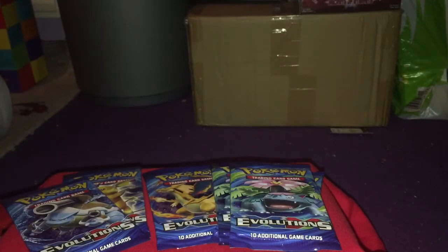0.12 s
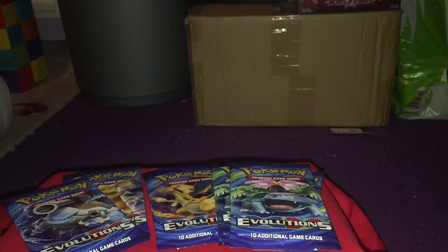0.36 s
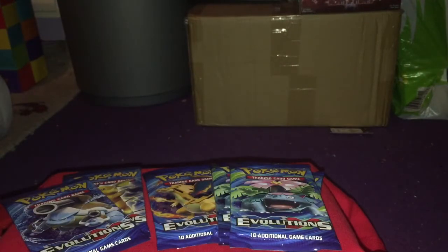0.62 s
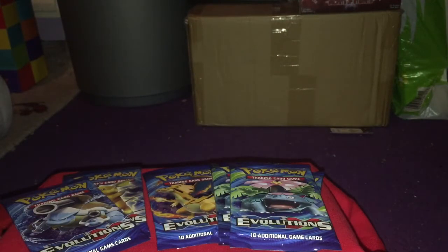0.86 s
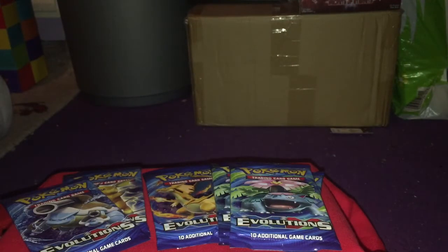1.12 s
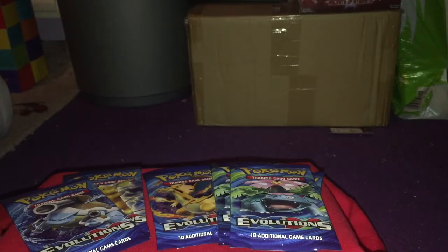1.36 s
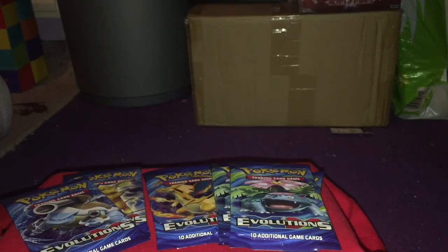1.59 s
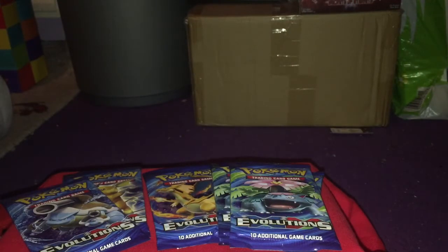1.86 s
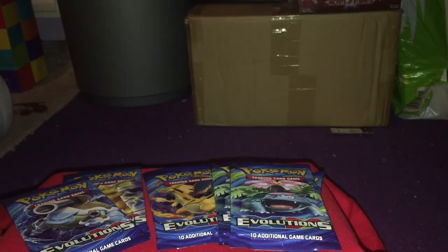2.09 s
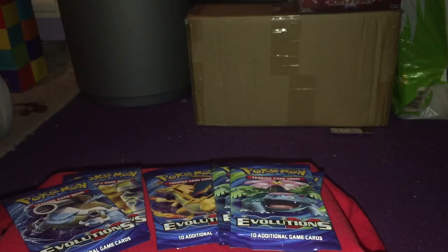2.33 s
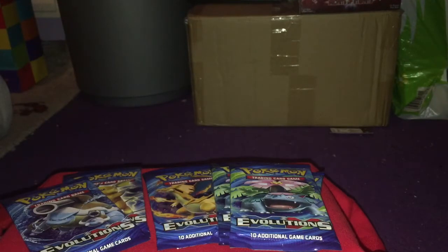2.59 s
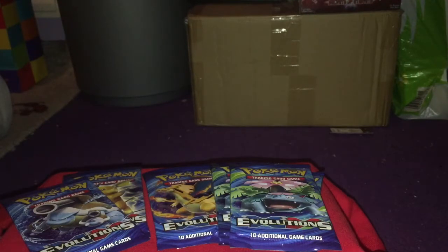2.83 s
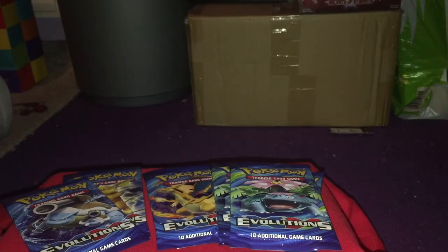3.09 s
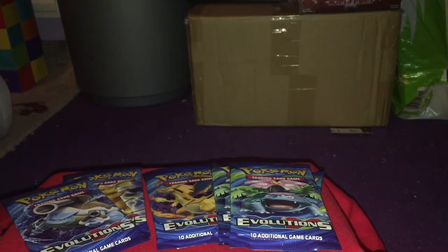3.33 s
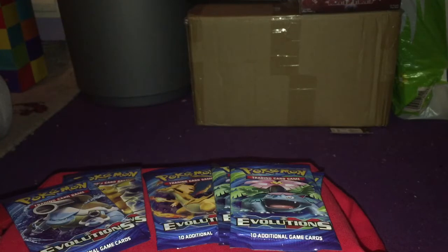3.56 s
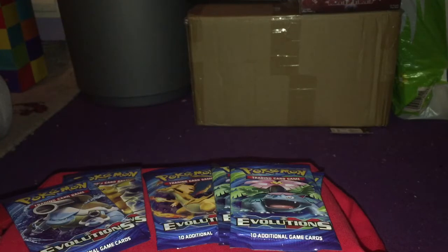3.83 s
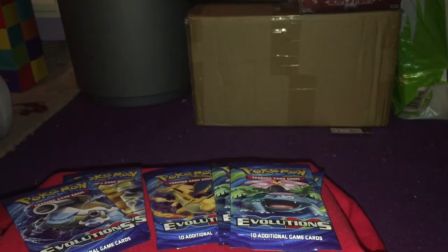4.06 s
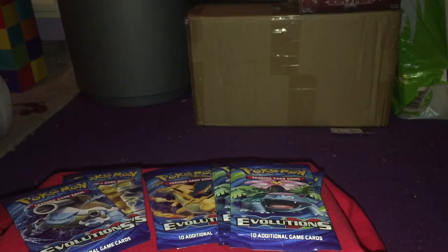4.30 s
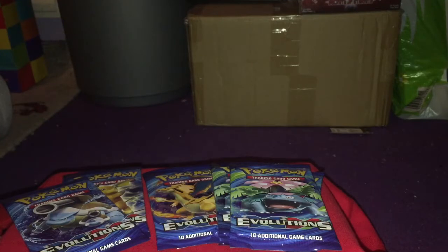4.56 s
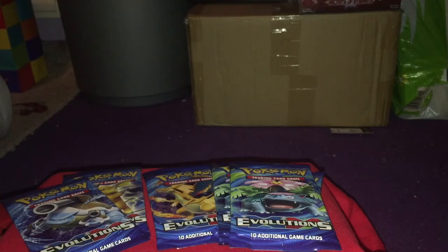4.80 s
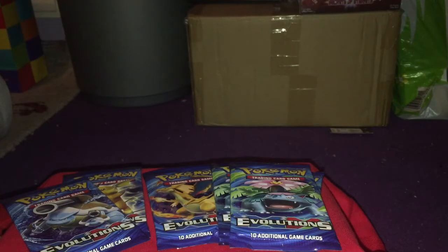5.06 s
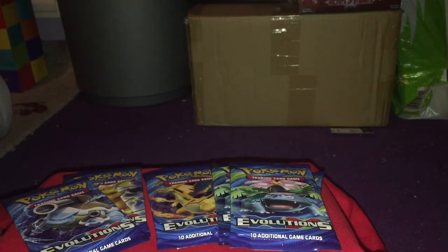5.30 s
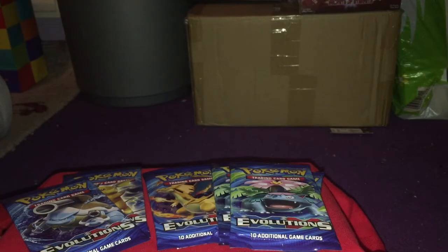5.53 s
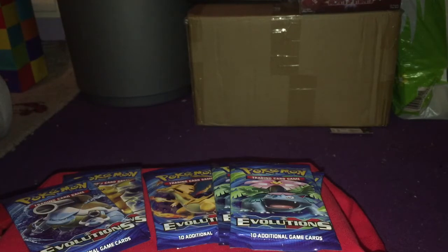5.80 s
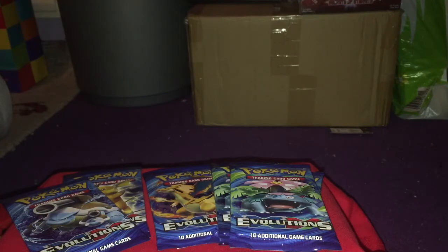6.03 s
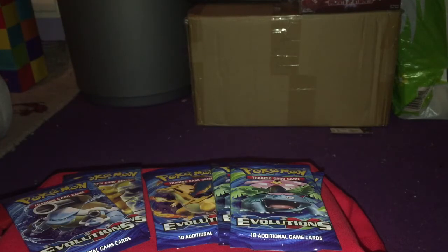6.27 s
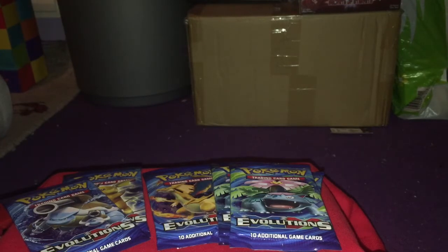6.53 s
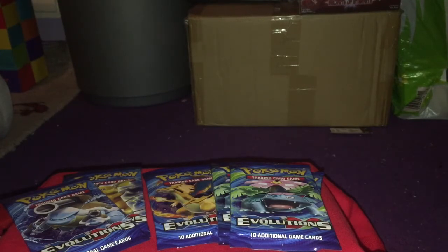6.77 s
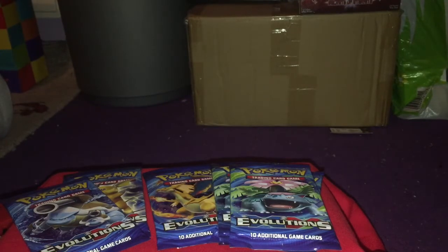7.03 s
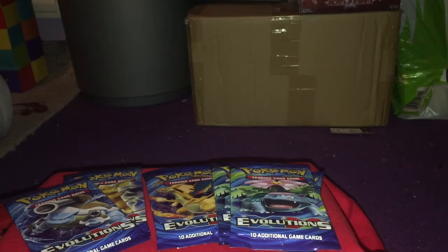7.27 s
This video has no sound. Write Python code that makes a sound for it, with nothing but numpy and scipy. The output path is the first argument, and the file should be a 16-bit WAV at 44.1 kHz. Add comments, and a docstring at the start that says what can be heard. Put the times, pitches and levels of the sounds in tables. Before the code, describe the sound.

Trading cards and crinkly foil wrappers handled close up in a small quiet room, with sharp snaps, hollow stack knocks and soft floor thumps.

```python
"""A faint hiss and an appliance's hum run throughout, under handling of cards and their plastic wrapping,
light to loud. Each stroke is a swarm of tiny creases over a sliding hiss, with card bends, a sleeve ring
and a low rumble. Stacks knock as short damped modes, stiffer folds snap as rings with noise, and the floor
thumps low. All is close to a microphone in a small quiet room; a near wall answers after milliseconds."""
import sys
import numpy as np
from scipy import signal
from scipy.fft import rfft, irfft, next_fast_len
from scipy.io import wavfile
from scipy.ndimage import uniform_filter1d, map_coordinates

SR = 44100
rng = np.random.default_rng(int(sys.argv[2]) if len(sys.argv) > 2 else 0)


def output_pcm(signal):
    """Save a mono or channel-first signal as 16-bit PCM at the path in sys.argv[1].

    Samples are clipped to [-1, 1] before scaling.
    """
    pcm = np.clip(np.atleast_2d(signal).T, -1, 1) * 32767
    wavfile.write(sys.argv[1], SR, np.round(pcm).astype(np.int16))


def linear_from_db(decibels):
    """Turn decibels (scalar or array-like) into linear amplitude factors; 0 gives 1."""
    return 10 ** (np.asarray(decibels, float) / 20)


N = 325899  # length in samples


def unit(x):
    """Scaled to rms 1."""
    return x / np.sqrt(np.mean(x ** 2) + 1e-20)


def along(points, hz):
    """Curve of (hz, value) points, read on a log frequency axis."""
    point_hz, value = np.transpose(points)
    return np.interp(np.log(hz + 1), np.log(point_hz + 1), value)


def wobble(rate_hz):
    """A smooth random curve with rate_hz knots a second."""
    knots = rng.standard_normal(int(N * rate_hz / SR) + 4)
    return map_coordinates(knots, [np.arange(N) * rate_hz / SR])


def shaped(x, response):
    """x filtered by a response given as a function of frequency."""
    size = next_fast_len(N + 8192)
    return irfft(rfft(x, size) * response(np.fft.rfftfreq(size, 1 / SR)), size)[..., :N]


def coloured(x, spectrum):
    """x filtered by a table of gains, at rms 1."""
    return unit(shaped(x, lambda hz: linear_from_db(along(spectrum, hz))))


def rings(start_s, size, hz, t60_s, count, attack_s):
    """Sum of damped sines, one for each start, each lasting count samples."""
    t = np.arange(count) / SR
    fade = linear_from_db(-60 * t / t60_s[:, None]) * (1 - np.exp(-t / attack_s))
    wave = size[:, None] * fade * np.sin(2 * np.pi * hz[:, None] * t)
    at = np.round(start_s * SR).astype(int)[:, None] + np.arange(count)
    return np.bincount(at.ravel(), wave.ravel(), N + count + SR)[:N]


def creases(count, hz, spread, cycles, spiky_db, size):
    """Tiny folds at random moments, each a brief ring at its own pitch; a few are much larger."""
    when, sign, rank = rng.random((3, count))
    pitch_hz = np.clip(hz * np.exp(spread * rng.standard_normal(count)), 100, SR / 2.5)
    swing = np.sign(sign - 0.5) * linear_from_db(-spiky_db * np.log(rank + 0.008))  # low ranks swing widest
    return unit(rings(when * N / SR, swing, pitch_hz, cycles / pitch_hz, size, attack_s=6e-5))


def flexing(x, depth_db, size, count):
    """A bending sheet keeps changing its modes: random peaks smoothed over size bins and count frames."""
    z = signal.stft(x, nperseg=512)[2]
    field = uniform_filter1d(rng.standard_normal(z.shape), size, 0)
    field = uniform_filter1d(field, count, 1)
    return unit(signal.istft(z * linear_from_db(depth_db * unit(field)), nperseg=512)[1][:N])


def swells(rows, peak_db):
    """Level over time of a layer: every stroke swells to its own peak and fades; their powers add."""
    swell_db = 20  # gained over the rise, lost over the fall
    roundness = 1.29  # 1 = pointed stroke, 2 = rounded top and steep ends
    peak_s, _, rise_s, fall_s = np.transpose(rows)[:4, :, None]
    t = np.arange(0, N + 64, 64) / SR
    away = np.where(t < peak_s, (peak_s - t) / rise_s, (t - peak_s) / fall_s)
    power = np.sum(linear_from_db(peak_db[:, None] - swell_db * away ** roundness) ** 2, axis=0)
    return np.interp(np.arange(N) / SR, t, np.sqrt(power))


# colour of the steady hiss: hz, gain_db
HISS_COLOUR = [(24, -35), (40, 7.5), (106, -6), (170, -5), (334, -11.5), (639, -16), (1080, -18.5),
               (1290, -18.5), (1690, -14.5), (2170, -20), (2650, -20.5), (5750, -24), (10500, -29),
               (11900, -27.5), (15600, -27)]
# partials of the appliance hum: pitch_hz, level_db (rms, about which the level wavers)
HUM_PARTIALS = [(96.9, -70.5), (145.3, -90)]


def background():
    """Microphone hiss is coloured noise that flutters; the hum is sines wavering in level and phase."""
    t = np.arange(N) / SR
    waver_db = 3 * wobble(3.5)
    hum = 0
    for pitch_hz, level_db in HUM_PARTIALS:
        phase = 2 * np.pi * pitch_hz * t + 1.24 * wobble(2.6)
        hum = hum + np.sqrt(2) * linear_from_db(level_db + waver_db) * np.sin(phase)
    flutter_db = 2.4 * wobble(15)
    hiss = coloured(rng.standard_normal(N), HISS_COLOUR)
    return linear_from_db(-68.5 + flutter_db) * hiss + hum


# colour of the crinkling wrapping: hz, gain_db
CRINKLE_COLOUR = [(590, -7), (1000, -42), (1240, -16), (1440, 2.5), (1740, 0.5), (2040, -1.5), (4000, 6),
                  (4830, 1.5), (6500, 1), (8450, -34), (14300, -120)]


def crinkle_texture(folds):
    """Mid-pitched folds over sliding noise, with the shifting modes of a bent sheet."""
    sliding = rng.standard_normal(N)
    return flexing(coloured(folds + 0.85 * sliding, CRINKLE_COLOUR), depth_db=4.6, size=2, count=12)


# colour of the bright top of the wrapping: hz, gain_db
SHEEN_COLOUR = [(3240, -12), (5500, -5.5), (6320, -6.5), (7830, -9), (8890, -6.5), (10400, -9), (12300, -8),
                (15600, -6)]


def sheen_texture():
    """Very short high ticks over sliding noise make the bright edge of the handling."""
    ticks = creases(count=16000, hz=9000, spread=0.5, cycles=5, spiky_db=3, size=48)
    sliding = rng.standard_normal(N)
    return flexing(coloured(ticks + 1.7 * sliding, SHEEN_COLOUR), depth_db=3.5, size=4, count=12)


# colour of the bending cards: hz, gain_db
BODY_COLOUR = [(160, -65), (280, -5.5), (571, -5), (629, -2), (873, -5), (1300, 2), (1690, -32),
               (2860, -120)]


def body_texture():
    """Bending cards give longer, lower-pitched creases under stronger sliding noise."""
    bends = creases(count=4000, hz=611.5, spread=0.36, cycles=15.5, spiky_db=2, size=512)
    sliding = rng.standard_normal(N)
    return flexing(coloured(bends + 3.86 * sliding, BODY_COLOUR), depth_db=4.3, size=1, count=8)


# modes rung by light rubbing: pitch_hz, width_hz, gain_db
RUB_MODES = [(2213, 380, 25), (3720, 20, -14)]


def rub_texture(folds):
    """Rubbing noise and a trace of the folds drive resonances of the sleeve."""
    def modes(hz):
        total = 0
        for pitch_hz, width_hz, gain_db in RUB_MODES:
            damping = 1j * hz * width_hz
            total = total + linear_from_db(gain_db) * damping / (pitch_hz ** 2 - hz ** 2 + damping)
        return total
    return unit(shaped(rng.standard_normal(N) + 0.071 * folds, modes))


# colour of the low handling rumble: hz, gain_db
RUMBLE_COLOUR = [(24, -41), (40, -22), (70, -5.5), (124, -3), (152, -0.5), (226, -10), (265, -8.5),
                 (330, -38), (430, -65), (730, -120)]


def rumble_texture():
    """Low noise whose level wavers at random."""
    return coloured(rng.standard_normal(N), RUMBLE_COLOUR) * linear_from_db(-6.0 + 2.75 * wobble(25))


# handling strokes, levels before each layer's trim:
# peak_s, crinkle_db, rise_s, fall_s, sheen_over_crinkle_db, rumble_over_crinkle_db
HANDLING = [ (0.03, -59.5, 0.2, 0.18, 1, -2), (0.312, -59.5, 0.12, 0.067, -8, 2.5),
            (0.351, -43, 0.015, 0.039, -11, -20), (0.434, -43.5, 0.041, 0.077, -8.5, -2),
            (0.535, -38, 0.036, 0.1, -10, -6), (0.575, -45.5, 0.069, 0.12, -13.5, 2),
            (0.752, -48.5, 0.029, 0.05, -18, -4), (0.85, -55.5, 0.31, 0.11, -8.5, -6),
            (0.955, -51.5, 0.18, .065, -12, -4), (1.075, -65.5, 0.15, 0.12, -8, 13),
            (1.236, -64.5, 0.21, .06, -5, 4), (1.368, -73.5, 0.085, 0.1, -8, 10),
            (1.51, -54.5, 0.041, 0.23, -20, -2), (1.592, -53, 0.056, 0.21, -4.5, -16),
            (1.669, -60.5, 0.17, 0.05, 2, 14), (1.85, -59, 0.15, 0.039, -8, -8),
            (1.888, -44.5, 0.027, 0.033, -17, 5), (2.023, -61, 0.099, 0.19, -7, 3.5),
            (2.215, -51, 0.063, 0.11, -13, 0), (2.295, -57.5, 0.13, 0.037, -7, 9.5),
            (2.54, -73.5, 0.22, 0.091, -15, 11), (2.587, -46.5, 0.042, 0.13, -11, 1.5),
            (2.875, -53.5, 0.037, 0.33, -10, 1), (2.963, -54, 0.21, 0.1, -0.5, 5),
            (3.055, -47.5, 0.042, 0.055, -8, -11), (3.15, -68, 0.057, 0.048, -8, 17),
            (3.239, -52.5, 0.1, 0.19, -4, -4), (3.475, -64.5, 0.06, 0.11, -12, 7),
            (3.518, -46, 0.023, 0.077, -10.5, -0.5), (3.6, -45.5, 0.019, 0.031, -8, 5.5),
            (3.663, -48.5, 0.038, 0.028, 0, -10), (3.766, -37.5, 0.04, 0.27, -3.5, -19),
            (3.838, -35.5, 0.1, 0.087, 0, -5.5), (3.928, -46, 0.24, 0.018, -3, 3),
            (4.088, -44.5, 0.072, 0.059, -0.5, -1.5), (4.244, -35.5, 0.035, 0.13, -4, -4.5),
            (4.295, -38, 0.081, 0.094, 1, -0.5), (4.342, -38, 0.09, .045, -1.5, 6.5),
            (4.45, -55.5, 0.036, 0.08, -2, -11), (4.5, -36.5, 0.032, 0.058, -7.5, -14),
            (4.541, -36.5, .06, 0.035, -7, -13), (4.6, -57, .06, 0.13, -4, 0),
            (4.708, -41.5, 0.024, 0.033, -9.5, -8.5), (4.8, -64, 0.06, 0.047, -6, -20),
            (4.874, -48, 0.04, 0.023, -5, -21), (4.964, -62, 0.077, 0.15, -2, -21),
            (5.044, -64, 0.15, 0.049, -5, 4), (5.165, -61.5, .075, 0.06, -1, -19),
            (5.217, -52.5, 0.057, 0.018, -1.5, -12), (5.31, -58, 0.043, 0.23, 3.5, -41),
            (5.425, -52, .12, 0.11, -1, 0), (5.5, -45.5, 0.16, 0.1, -1.5, -26),
            (5.558, -35, 0.044, .06, -1.5, -2), (5.604, -47, 0.15, 0.028, 7, 2),
            (5.715, -54, 0.02, 0.056, 8, -27), (5.783, -35, 0.052, 0.053, 0, -6),
            (5.85, -39.5, 0.072, 0.053, -1, 0), (5.948, -63, 0.032, 0.033, -7, 19),
            (6.015, -66, 0.11, .1, -3, -15), (6.068, -53.5, 0.043, .035, -3, -6),
            (6.299, -67.5, .105, 0.063, 2, 13.5), (6.421, -71.5, 0.065, 0.034, -17, -3),
            (6.495, -63, 0.037, 0.054, -5, 7), (6.57, -69.5, 0.13, 0.11, 2, 3),
            (6.651, -49, .05, 0.23, -0.5, -29), (6.72, -52, 0.096, 0.053, 7.5, 7.5),
            (6.801, -33, 0.1, 0.078, -1.5, -1.5), (6.895, -51.5, 0.11, .12, -6, 3),
            (7.0, -56, 0.041, 0.04, -4, 4.5), (7.06, -66.5, .1, .1, -0.5, 10),
            (7.116, -52, 0.041, 0.055, -10, 3), (7.247, -48.5, 0.077, 0.19, -9, -11.5),
            (7.351, -56.5, 0.23, 0.026, -7.5, -8)]
# light slides of a finger that ring the sleeve, levels before stick and slip:
# peak_s, level_db, rise_s, fall_s
FINGER_SLIDES = [(0.05, -58, 0.28, 0.085), (0.66, -55.5, 0.056, 0.031), (0.87, -59.5, 0.13, 0.19),
                 (1.65, -55, 0.098, 0.037), (2.6, -57, 0.069, 0.088), (4.43, -64, .06, .06),
                 (5.02, -66, 0.065, .05), (5.205, -56, 0.04, 0.031), (5.36, -56, .12, 0.1),
                 (6.02, -66.5, 0.042, .06), (7.3, -74, 0.079, 0.1)]
# slow trim of the card body, lowest around 4.1 to 4.3 s: time_s, gain_db
CARD_LEVEL = [(0, -7.5), (.6, -10), (1.1, -5), (2.2, -5), (3.3, -5.5), (3.65, -11), (3.85, -5),
              (4.1, -15.5), (4.3, -14.5), (4.4, -10), (4.9, -8), (5.4, -11.5), (6.0, -10.5), (6.8, -7),
              (7.39, -7.5)]


def strokes():
    """Creases and sliding hiss rise and fall together; fingers stick and slip many times a second."""
    db, sheen_db, rumble_db = np.transpose(HANDLING)[[1, 4, 5]]
    folds = creases(count=9000, hz=2800, spread=0.45, cycles=12, spiky_db=1.8, size=240)
    crinkle = swells(HANDLING, db) * crinkle_texture(folds) * linear_from_db(-5.0)
    sheen = swells(HANDLING, db + sheen_db) * sheen_texture() * linear_from_db(-3.0)
    # strokes with more rumble bend the cards more: 0.35 dB per dB
    card_db = np.interp(np.arange(N) / SR, *np.transpose(CARD_LEVEL))
    body = swells(HANDLING, db + 0.35 * rumble_db) * body_texture() * linear_from_db(card_db)
    # the ring is -67 dB under a -60 dB stroke and grows 0.73 dB per dB of crinkle
    stroke_ring = swells(HANDLING, -67 + 0.73 * (db + 60))
    slide_ring = swells(FINGER_SLIDES, np.transpose(FINGER_SLIDES)[1])
    ring = np.hypot(stroke_ring, slide_ring) * rub_texture(folds)
    rumble = swells(HANDLING, db + rumble_db) * rumble_texture()
    slip = linear_from_db(1.66 * wobble(35) + 1.49 * wobble(120))
    return slip * (crinkle + sheen + body + ring) + rumble


# hollow knocks of a stack, before mode ratios and trims: start_s, level_db, pitch_hz
STACK_KNOCKS = [(0.051, -49.5, 440), (0.182, -52, 625), (0.515, -28.5, 1010), (0.693, -44, 1150),
                (0.838, -46, 1020), (0.932, -39, 1190), (0.951, -37, 1130), (1.005, -38, 680),
                (1.0658, -26.5, 652), (1.539, -28, 870), (1.611, -39.5, 626), (1.649, -45, 500),
                (1.877, -38, 402), (2.013, -45.5, 620), (2.184, -17, 560), (2.196, -25.5, 770),
                (2.211, -33, 920), (2.943, -46, 535), (3.526, -37.5, 1130), (3.631, -35.5, 460),
                (4.322, -50, 624), (4.499, -35, 766), (4.547, -37.5, 398), (5.54, -32, 1140),
                (5.771, -32.5, 684), (6.787, -23.5, 1180), (7.19, -43, 855)]


def knocks():
    """The stack rings briefly near its pitch and, weaker, at two higher modes."""
    s, db, hz = np.transpose(STACK_KNOCKS)
    start_s = s + 0.0011
    t60_s = np.full_like(s, 0.013)
    out = np.zeros(N)
    for ratio, level_db in [(1.018, 4.5), (1.4, -0.5), (1.9, -6)]:
        out -= rings(start_s, linear_from_db(db + level_db), hz * ratio, t60_s, count=3000, attack_s=0.0008)
    return out


# early wall echoes, before softening: delay_s, gain_db
WALL_ECHOES = [(.004, -10), (.0085, -41), (0.0127, -13), (0.023, -45)]
# decay of the room tail: hz, t60_s
ROOM_DECAY = [(100, 0.031), (1000, 0.089), (4000, 0.097), (12000, 0.099)]


def room(x):
    """A few soft early walls, then a tail in which each frequency dies at its own speed."""
    early = 0
    for delay_s, gain_db in WALL_ECHOES:
        early = early + linear_from_db(gain_db) * np.pad(x, (round(delay_s * SR), 0))[:N]
    early = shaped(early, lambda hz: 1 / (1 + 1j * hz / 9000))
    hz, t, z = signal.stft(rng.standard_normal(SR // 2), SR, nperseg=256)
    fade = linear_from_db(-60 * t / along(ROOM_DECAY, hz)[:, None])
    tail = signal.istft(z * fade, SR, nperseg=256)[1]
    delayed = np.pad(x, (380, 0))  # samples
    late = signal.fftconvolve(delayed, tail / np.linalg.norm(tail))[:N]
    return early + linear_from_db(-6.5) * late


# folds that snap, levels before each part's trim: start_s, level_db, pitch_hz, sheen_over_level_db
FOLD_SNAPS = [(0.2907, -43, 2070, -23), (0.349, -39, 2760, -14), (0.416, -35, 1750, -8),
              (0.5152, -9.5, 2570, -16), (0.5284, -21, 2160, -7), (0.5531, -17, 1870, -8),
              (0.7425, -40.5, 2280, -22), (0.9315, -33, 4110, -12), (0.9512, -34.5, 1900, -23),
              (1.5412, -24.5, 2700, -42), (1.875, -29, 3460, -12), (1.8803, -29.5, 1660, -14),
              (2.0152, -39, 1690, -18), (2.1862, -23, 1800, -46), (2.574, -37, 2380, -27),
              (2.597, -40, 2270, -17), (2.8965, -38.5, 1330, -17), (2.9414, -34, 1750, -6),
              (3.0462, -33, 2200, -27), (3.512, -36, 2100, -21), (3.5269, -29.5, 1960, -20),
              (3.5987, -39.5, 2100, -1), (3.6481, -42, 2190, -25), (3.657, -37.5, 2500, -15),
              (3.7733, -27, 2750, -13), (4.2285, -23, 4500, -24), (4.4653, -29.5, 3470, -14),
              (4.4976, -12, 5120, -30), (4.5014, -10.5, 3750, -39), (4.5254, -45, 2340, -17),
              (4.5454, -25, 2650, -9), (4.576, -22, 3940, -21), (4.7006, -34, 3550, -26),
              (4.8754, -40, 2770, -10), (5.4304, -32.5, 2440, 1), (5.484, -37, 3230, -13),
              (5.5159, -23.5, 3600, -20), (5.5368, -29, 2200, 0.5), (5.5562, -23, 2760, -20),
              (5.6975, -46, 3860, 7.5), (5.743, -60, 3630, -17), (5.76, -32, 2620, -13),
              (5.7812, -27, 1810, -32), (5.8376, -31.5, 1810, -17), (6.0706, -37.5, 2020, 9.5),
              (6.4348, -38.5, 3060, -28), (6.483, -38, 2400, -31), (6.633, -40, 3160, -11),
              (6.6787, -26, 2130, -5), (6.733, -32, 2500, -14), (6.784, -25, 1800, -14),
              (6.898, -33.5, 2200, -15), (6.994, -56, 2220, -6), (7.1115, -37, 2680, -17)]


def snaps():
    """A fold lets go: a short ring at its pitch, a bright crack and a fading noise of smaller releases."""
    s, db, hz, sheen_db = np.transpose(FOLD_SNAPS)
    s = s + 0.00048
    out = rings(s, linear_from_db(db + 2.5), hz, 14 / hz, count=600, attack_s=0.00042)
    t = np.arange(3000) / SR
    onset = 1 - np.exp(-t / 9e-4)
    bright = signal.butter(2, 4500, "high", fs=SR)
    for at, level_db, pitch_hz, bright_db in zip(s, db, hz, sheen_db):
        noise = rng.standard_normal((2, len(t)))
        around = signal.butter(1, [pitch_hz / 1.5, min(pitch_hz * 1.6, 15000)], "band", fs=SR)
        scatter = unit(signal.lfilter(*around, noise[0])) * linear_from_db(level_db - 22.0 - 60 * t / 0.044)
        crack = unit(signal.lfilter(*bright, noise[1])) * onset
        crack *= linear_from_db(level_db + bright_db - 2 - 60 * t / 0.011)
        piece = out[round(at * SR):][:len(t)]  # a view: adding to it fills out
        piece += (scatter + crack)[:len(piece)]
    return out


# soft thumps through the floor, before delays and trims: start_s, level_db, pitch_hz, board_over_level_db
FLOOR_THUMPS = [(0.547, -30.5, 209, -3), (0.685, -46, 186, -7), (0.948, -42.5, 280, -25),
                (1.055, -44, 157, -24), (1.597, -41.5, 172, -1), (1.867, -33, 194, -31),
                (2.18, -23.5, 134, -21), (2.579, -45, 250, -24), (2.66, -41.5, 167, -3),
                (2.942, -37, 210, -9), (2.945, -36, 124, -22), (3.242, -47, 191, -5), (3.463, -36, 81, -17),
                (3.583, -37, 67.4, -3), (3.81, -40, 149, -20), (4.079, -35, 150, -12),
                (4.259, -52, 143, -10), (4.331, -32, 155, -7), (4.491, -41.5, 216, -25),
                (4.614, -48, 198, -9), (4.701, -45.5, 196, -2), (5.021, -38.5, 109, -10),
                (5.205, -43.5, 134, -2.5), (5.408, -34, 110, -11), (5.55, -31.5, 80, 0),
                (5.771, -35, 67, -10), (5.933, -42, 103, -5), (6.282, -38, 77, -21), (6.489, -51, 111, 2.5),
                (6.606, -37.5, 65.3, -8), (6.715, -37, 76, -8)]


def thumps():
    """Low blows come through the carpet with a soft start; a 66 Hz floorboard swings in later."""
    s, db, hz, board_db = np.transpose(FLOOR_THUMPS)
    start_s = s + 0.008
    blow = rings(start_s, linear_from_db(db + 2.0), hz, np.full_like(s, 0.067), count=8000, attack_s=0.0029)
    board = rings(start_s + 0.0087, linear_from_db(db + board_db + 5.5), np.full_like(s, 66),
                  np.full_like(s, 0.1), count=8000, attack_s=0.014)
    return blow + board


def scene():
    """Snaps and knocks sound the room; the strokes are close and dry."""
    blows = snaps() + knocks()
    mix = background() + strokes() + blows + room(blows) + thumps()
    return mix[None]  # one channel


# microphone colour: hz, gain_db
MIC_COLOUR = [(20, -39), (42, -0.5), (9800, 0), (10500, -4), (11200, 0), (15750, -4.5), (15900, -35)]


def microphone(dry):
    """A small microphone passes little deep bass and falls off steeply at the top."""
    return shaped(dry, lambda hz: linear_from_db(along(MIC_COLOUR, hz)))


def roll_off(x):
    """The treble ends steeply here."""
    return signal.sosfilt(signal.butter(12, 16510, fs=SR, output="sos"), x)


def record(dry):
    """The scene as picked up by the microphone and delivered."""
    mix = microphone(dry)
    return roll_off(mix)


dry = scene()
out = record(dry)
output_pcm(out)
```